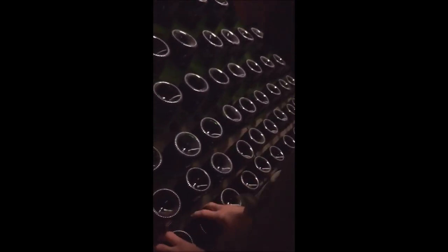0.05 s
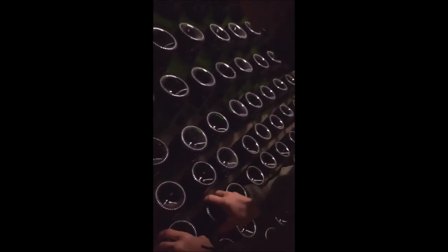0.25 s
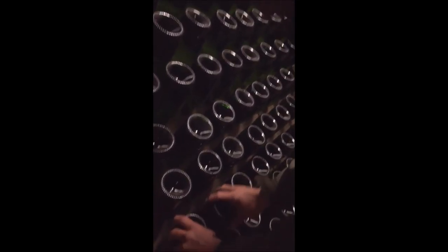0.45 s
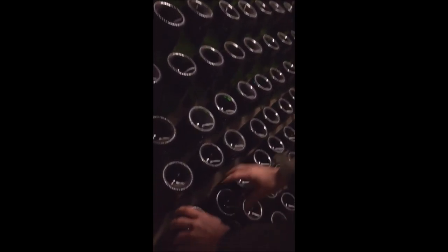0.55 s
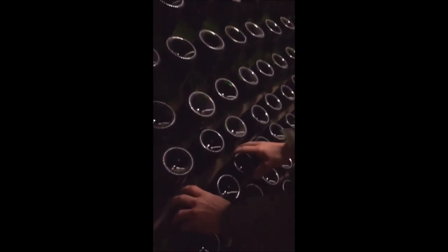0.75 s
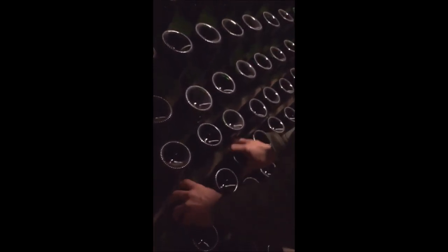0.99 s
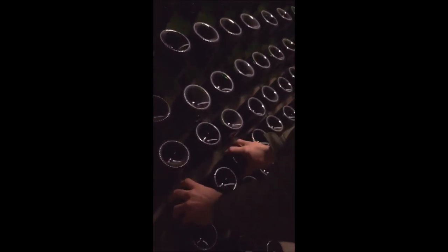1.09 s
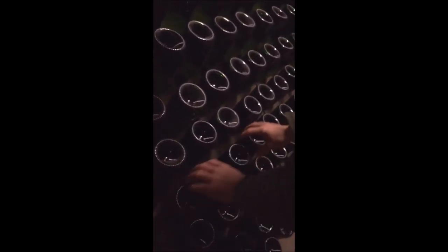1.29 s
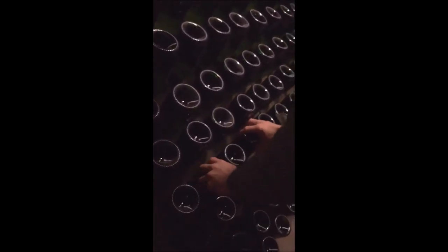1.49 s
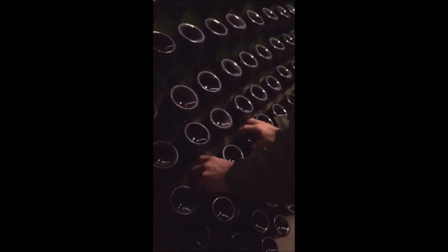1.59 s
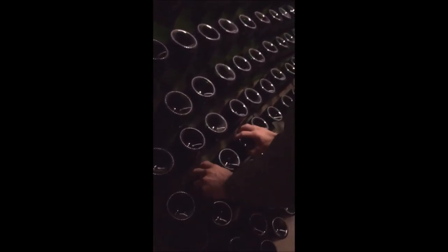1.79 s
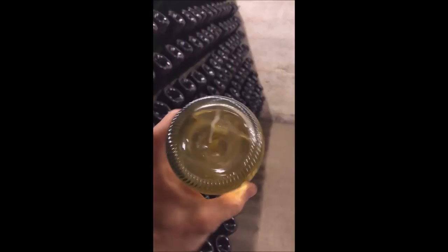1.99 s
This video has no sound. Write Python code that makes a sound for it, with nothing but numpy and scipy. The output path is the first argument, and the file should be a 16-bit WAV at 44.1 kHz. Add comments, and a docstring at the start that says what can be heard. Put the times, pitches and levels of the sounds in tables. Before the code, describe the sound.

Wine bottles are turned by hand in a wooden rack. A bright, ringing double clink comes first, then dull knocks as bottles drop back into their holes. Faint rubbing and a low rumble fill the reverberant cellar.

```python
"""Wine bottles in a cellar rack

Bottles are turned by hand in a wooden rack. One clinks twice against its neighbour, exciting the
high modes of the glass; others drop back into their holes with dull knocks. Glass and sleeves
rub faintly, and the stone vault rumbles and reverberates. Near the end everything stops
abruptly except a faint noise floor."""
import sys
import numpy as np
from scipy import signal
from scipy.fft import rfft, irfft, next_fast_len
from scipy.io import wavfile

SR = 44100
rng = np.random.default_rng(int(sys.argv[2]) if len(sys.argv) > 2 else 0)


def materialize(psi):
    """Save the field psi as 16-bit PCM at rate SR to the path in sys.argv[1].

    A 1-D psi becomes a single channel; in a 2-D psi each row is a channel.
    """
    bounded = np.clip(np.atleast_2d(psi).T, -1, 1)
    quanta = np.round(bounded * 32767).astype(np.int16)
    wavfile.write(sys.argv[1], SR, quanta)


N = 90404


def amp(db):
    """Amplitude ratio of a level in decibels."""
    return 10 ** (np.asarray(db) / 20)


def along(points, hz):
    """Interpolation of (f/Hz, value) points on a logarithmic frequency axis."""
    f, v = np.transpose(points)
    return np.interp(np.log(hz + 1), np.log(f + 1), v)


def envelope(points):
    """Amplitude envelope through (t/s, level/dB) points."""
    return amp(np.interp(np.arange(N) / SR, *np.transpose(points)))


def delayed(x, seconds):
    """Pure time delay."""
    return np.pad(x, (max(round(seconds * SR), 0), 0))[:N]


def filtered(x, response):
    """Linear filtering: the spectrum is multiplied by a frequency response."""
    size = next_fast_len(N + SR // 2)
    return irfft(rfft(x, size) * response(np.fft.rfftfreq(size, 1 / SR)), size)[:N]


def noise(spectrum):
    """Gaussian noise of unit rms, shaped by (f/Hz, level/dB) points."""
    x = filtered(rng.standard_normal(N), lambda hz: amp(along(spectrum, hz)))
    return x / np.sqrt(np.mean(x ** 2) + 1e-20)


def damped(x, t60s):
    """Frequency-dependent damping: each band decays exponentially at its own rate."""
    hz, t, bands = signal.stft(x, SR, nperseg=256)
    decay = amp(-60 * t / along(t60s, hz)[:, None])
    return signal.istft(bands * decay, SR, nperseg=256)[1][:N]


def mode(hz, t60, rise_s):
    """Free vibration of one mode: a damped sinusoid with a gradual onset."""
    t = np.arange(SR * 3 // 4) / SR
    vibration = np.sin(2 * np.pi * hz * t) * amp(-60 * t / t60) * (1 - np.exp(-t / rise_s))
    return np.pad(vibration, (0, N - len(t)))


def burst(spectrum, t60):
    """A transient: decaying noise through a minimum-phase filter."""
    size = 8192
    cepstrum = irfft(np.log(amp(along(spectrum, np.fft.rfftfreq(size, 1 / SR)))))
    causal_fold = np.r_[1, np.full(size // 2 - 1, 2), np.zeros(size // 2)]
    response = irfft(np.exp(rfft(cepstrum * causal_fold)))
    puff = rng.standard_normal(N) * amp(-60 * np.arange(N) / SR / t60)
    return signal.fftconvolve(puff, response / np.linalg.norm(response))[:N]


# Spectrum of the quiet room: f/Hz, level/dB
FLOOR_SPECTRUM = [(25, -24.5), (100, 3), (250, -5.5), (450, -6.5), (900, -22.5), (2500, -25.5), (7000, -32),
                  (16000, -36)]
def noise_floor():
    """Stationary ambient noise, strongest in the bass."""
    return amp(-56) * noise(FLOOR_SPECTRUM)


# Spectrum of the vault's rumble: f/Hz, level/dB
RUMBLE_SPECTRUM = [(25, -38), (60, -6.5), (115, 4), (170, -1.5), (280, 0), (450, -4.5), (800, -9.5),
                   (2000, -28.5), (5000, -37), (16000, -59.5)]
# Its envelope: t/s, level/dB
RUMBLE_ENVELOPE = [(0, -47.5), (.2, -57.5), (.7, -55), (1.4, -54.5), (1.7, -61), (1.95, -47)]
def rumble():
    """Low-frequency noise in the vault, slowly modulated in amplitude."""
    return envelope(RUMBLE_ENVELOPE) * noise(RUMBLE_SPECTRUM)


# Spectrum of the friction: f/Hz, level/dB
RUB_SPECTRUM = [(200, -6.5), (1000, 0), (3000, -1.5), (5000, -4), (11000, -9), (16000, -15.5)]
# Its envelope: t/s, level/dB
RUB_ENVELOPE = [(0, -47), (.1, -57), (.22, -57.5), (.5, -64.5), (.6, -56), (.71, -71.5), (.86, -59),
                (.98, -71.5), (1.2, -60.5), (1.33, -68.5), (1.47, -58.5), (1.53, -76), (1.85, -72.5),
                (1.95, -66)]
def rubbing():
    """Sliding friction of glass and sleeves radiates broadband noise."""
    return envelope(RUB_ENVELOPE) * noise(RUB_SPECTRUM)


# Initial spectrum of the diffuse field: f/Hz, level/dB
REVERB_SPECTRUM = [(100, 1), (450, -2.5), (750, -3), (1200, -2), (3000, -7), (6000, -1), (14000, -7)]
# Reverberation time: f/Hz, T60/s
REVERB_DECAY = [(100, 1.3), (450, 0.96), (1000, 0.68), (2500, 0.6), (5000, 0.37), (12000, 0.23)]
def vault(x, rise_s=0.0027):
    """Reverberation: convolution with a diffuse tail whose treble is absorbed first."""
    build_up = 1 - np.exp(-np.arange(N) / SR / rise_s)
    tail = damped(noise(REVERB_SPECTRUM), REVERB_DECAY) * build_up
    return signal.fftconvolve(x, tail / np.linalg.norm(tail))[:N]


# Echoes from the near walls: delay/s, level/dB
WALL_ECHOES = [(.008, -14.5), (0.0178, -6)]
def walls(x, cutoff_hz=1200):
    """Early reflections: delayed, low-passed copies of the direct sound."""
    echoes = sum(amp(db) * delayed(x, delay) for delay, db in WALL_ECHOES)
    return filtered(echoes, lambda hz: 1 / (1 + 1j * hz / cutoff_hz))


# Modes of the bottles: f/Hz, level/dB, nominal T60/s, rise time/s
BOTTLE_MODES = [(2650, -4, .23, .026), (4327, -11, .18, .0004), (5290, -12.5, .32, .0005),
                (5814, -26, .23, .001), (7052, -32, .36, .003), (5383, -25, .22, .001),
                (5763, -31, .15, .001), (8952, -33, .17, .001), (9155, -25, .14, .001),
                (13371, -31, .15, .002), (11200, -28, .16, .001), (11450, -25, .11, .001),
                (11540, -26, .08, .001), (13790, -36, .14, .002), (15440, -41, .12, .002),
                (2869, -35, .3, .004)]
def glass(contacts, t60_scale):
    """Two-stage modal decay: each (t/s, level/dB) contact adds energy to every glass mode."""
    t = np.arange(SR) / SR
    out = np.zeros(SR)
    for hz, db, t60, rise_s in BOTTLE_MODES:
        energy = 0
        for start, contact_db in contacts:
            age = np.maximum(t - start, 0)
            onset = 1 - np.exp(-age / rise_s)
            prompt = amp(-60 * age / (t60 * t60_scale))
            aftersound = amp(-29 - 60 * age / (0.74 * t60_scale))
            energy += (amp(db + contact_db) * onset * (prompt + aftersound)) ** 2
        out += np.sqrt(energy) * np.sin(2 * np.pi * (hz * t + rng.random()))
    return np.pad(out, (0, N - SR))


def hollow(hz, peak_s=0.0026):
    """Heavily damped resonance: a bottle seats in its hole with a clunk of a few cycles."""
    t = np.arange(N) / SR
    swell = (t / peak_s * np.exp(1 - t / peak_s)) ** 2
    return np.sin(2 * np.pi * hz * t) * swell


def contact_filter(x, cutoff_hz, bass_db, shelf_hz=207, inverse_q=1.096):
    """Contact compliance: a softer blow has a lower cut-off; a shelf sets its bass."""
    def response(hz):
        shelf = amp(bass_db / (1 + (hz / shelf_hz) ** 2))
        ratio = hz / cutoff_hz
        return shelf / (1 + 1j * inverse_q * ratio - ratio ** 2)
    return filtered(x, response)


# Spectrum of the wooden clatter: f/Hz, level/dB
CLATTER_SPECTRUM = [(40, -44.5), (110, -7.5), (230, -13.5), (360, 0.5), (650, -3), (1050, -1), (1700, -7),
                    (2200, -7.5), (3100, -7), (4600, -16.5), (8000, -17.5), (16000, -15.5)]
# Its decay time: f/Hz, T60/s
CLATTER_DECAY = [(150, 0.23), (900, 0.079), (3000, 0.023), (12000, 0.11)]
# Modes of the rack: f/Hz, level/dB, T60/s
RACK_MODES = [(304, -13.5, .09), (389.4, -19, 0.12), (670, -12.5, 0.069), (823, -8, 0.085),
              (1040, -8, 0.094), (1176, -16.5, 0.051)]
# Brief snap of glass on wood: f/Hz, level/dB, T60/s
SNAP_MODES = [(2450, 1.5, 0.0052), (2880, 2, 0.0086), (3515, -0.5, 0.0076)]
# Bottles meeting the rack: t/s, clunk f/Hz, clunk/dB, clatter/dB, bass/dB, cut-off/Hz, reverb/dB
RACK_IMPACTS = [(.338, 404.4, -25, -31, 1.5, 750, -2), (.3545, 732, -25.5, -19.5, -8, 1060, -7.5),
                (.381, 428, -21.5, -29, -2.5, 5900, -16), (0.396, 1115, -20, -24.5, 5.5, 3730, -8),
                (.405, 492, -13.5, -13, -3, 3400, -9.5), (.874, 482, -45.5, -45, -6, 4940, -7),
                (0.9402, 494, -29.5, -39, 16.5, 1170, -3), (1.0150, 918, -20, -32, 14.5, 3670, -6),
                (1.0398, 531, -17, -12, -1, 3900, -10), (1.353, 493, -64, -56.5, -7.5, 15140, -12.5),
                (1.603, 496, -40, -54.5, -3, 686, -18), (1.7707, 509, -9.5, -21.5, 8, 3085, -10)]
def knocks():
    """Impact excitation: each blow drives the rack, its hollow and the hand-damped glass."""
    held_glass = amp(-22) * glass([(0.0012, 0)], t60_scale=0.6)
    wood = sum(amp(db) * mode(hz, t60, rise_s=0.0006) for hz, db, t60 in RACK_MODES + SNAP_MODES)
    out = np.zeros(N)
    for start, clunk_hz, clunk_db, clatter_db, bass_db, cutoff_hz, reverb_db in RACK_IMPACTS:
        vibration = damped(noise(CLATTER_SPECTRUM), CLATTER_DECAY) + wood + held_glass
        clatter = amp(clatter_db) * contact_filter(vibration, cutoff_hz, bass_db)
        clunk = amp(clunk_db) * hollow(clunk_hz)
        direct = clatter + clunk
        # The clunk sounds inside the rack, so less of it reaches the vault.
        reverb = amp(reverb_db) * vault(clatter + amp(-1) * clunk)
        out += delayed(direct + walls(direct) + reverb, start)
    return out


# Modes of the neighbouring bottle: f/Hz, level/dB, T60/s
NEIGHBOUR_MODES = [(4335, 0, .22), (7060, -12, .18), (11450, -15, .14)]
# Light contacts with it: t/s, level/dB
LIGHT_CONTACTS = [(.603, -49), (1.05, -44), (1.353, -57)]
def touches():
    """Weak excitation: a light touch sets only a few modes ringing."""
    ping = sum(amp(db) * mode(hz, t60, rise_s=0.00092) for hz, db, t60 in NEIGHBOUR_MODES)
    return sum(delayed(amp(db) * ping, start) for start, db in LIGHT_CONTACTS)


# Spectrum of the contact transient: f/Hz, level/dB
CRACK_SPECTRUM = [(80, -30), (300, -2), (650, -7.5), (1450, 1), (2200, -9.5), (4000, -6.5), (5500, -15),
                  (6700, -23), (11000, -29), (16000, -28.5)]
# Dense cluster of high glass modes: f/Hz, level/dB
SHIMMER_SPECTRUM = [(3000, -45), (4000, -11), (4400, -9), (4750, -35), (5400, -6.5), (6000, -1.5),
                    (6550, -35), (7100, -2.5), (7600, -20), (9100, -16), (10300, -26), (11300, -6),
                    (12100, -33), (13300, -8), (15000, -25), (16000, -23)]
# Glass striking glass: t/s, ring level/dB, crack and shimmer level/dB
GLASS_IMPACTS = [(0.2455, -1, 1), (.2690, -8, -5)]
def clinks():
    """Hard impact: a short contact gives a broadband crack, a shimmer and a long, bright ring."""
    out = glass([(start, ring_db) for start, ring_db, _ in GLASS_IMPACTS], t60_scale=0.96)
    for start, _, transient_db in GLASS_IMPACTS:
        crack = amp(-13) * burst(CRACK_SPECTRUM, t60=0.036)
        shimmer = amp(-30) * burst(SHIMMER_SPECTRUM, t60=0.13)
        out += delayed(amp(transient_db) * (crack + shimmer), start)
    return out


def scene(stop_s=1.963, fade_s=0.0018):
    """Superposition of the sources; a gate shuts off all but the noise floor."""
    ringing = clinks() + touches()
    cellar = ringing + amp(-14) * vault(ringing) + knocks() + rubbing() + rumble()
    gate = np.clip((stop_s - np.arange(N) / SR) / fade_s + 0.5, 0, 1)
    return (gate * cellar + noise_floor())[None]


def record(dry):
    """Band limiting: a small microphone loses the deep bass and the highest treble."""
    low_hz, top_hz = 77, 16000
    thin = signal.sosfilt(signal.butter(2, low_hz, "highpass", fs=SR, output="sos"), dry[0])
    return filtered(thin, lambda hz: hz < top_hz)[None]


dry = scene()
out = record(dry)
materialize(out)
```